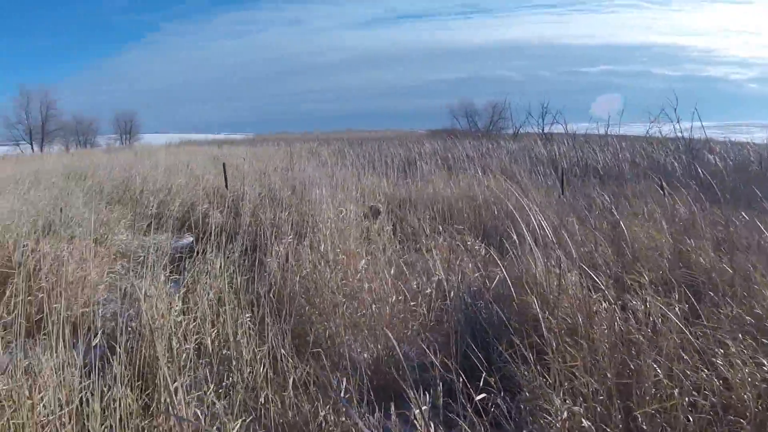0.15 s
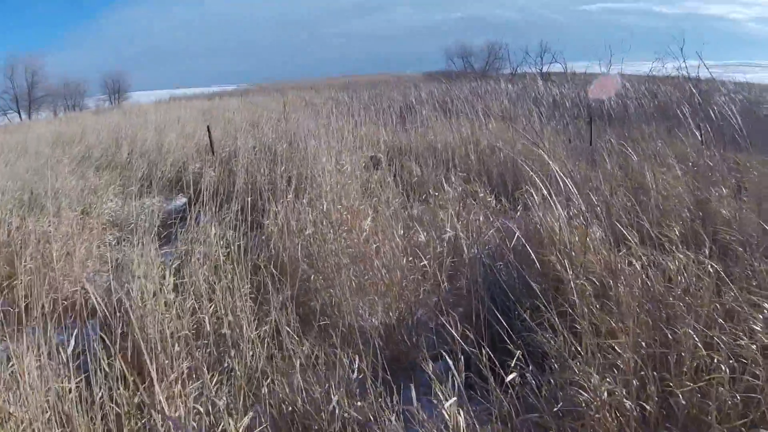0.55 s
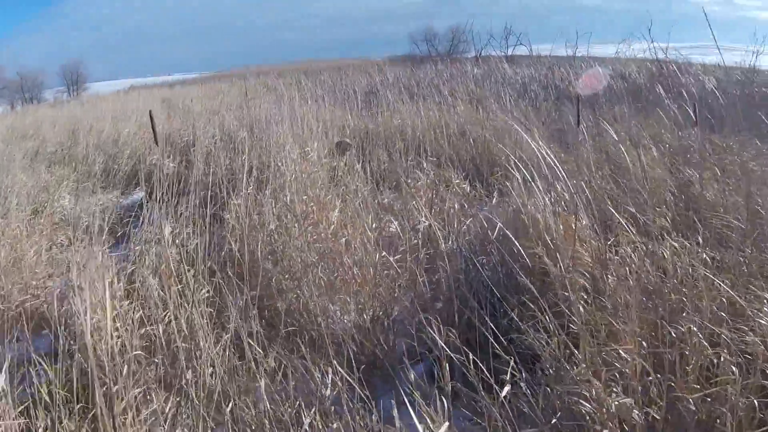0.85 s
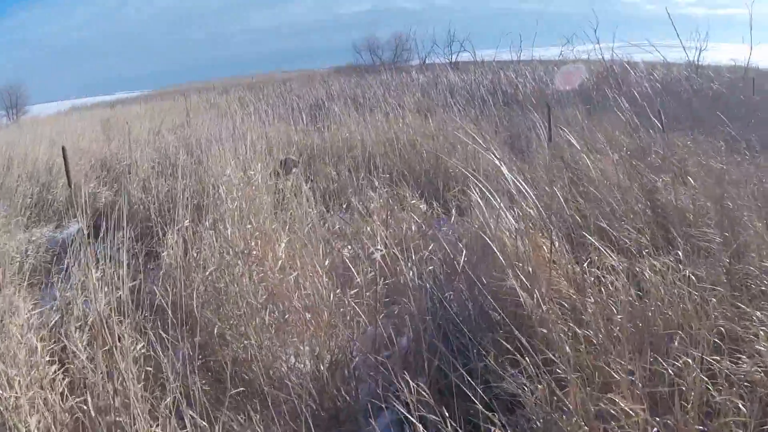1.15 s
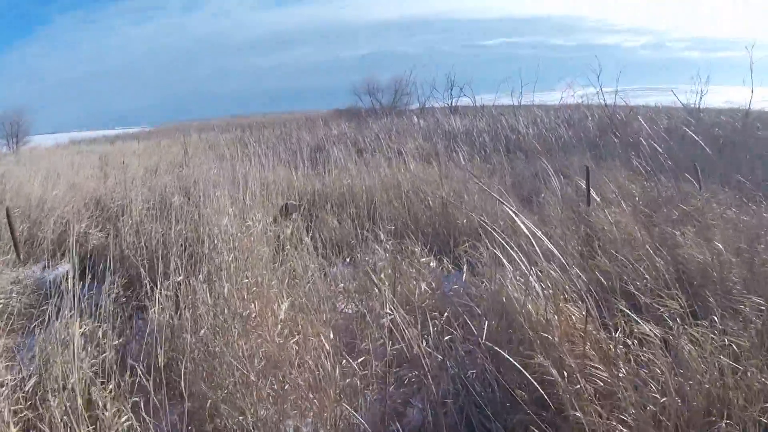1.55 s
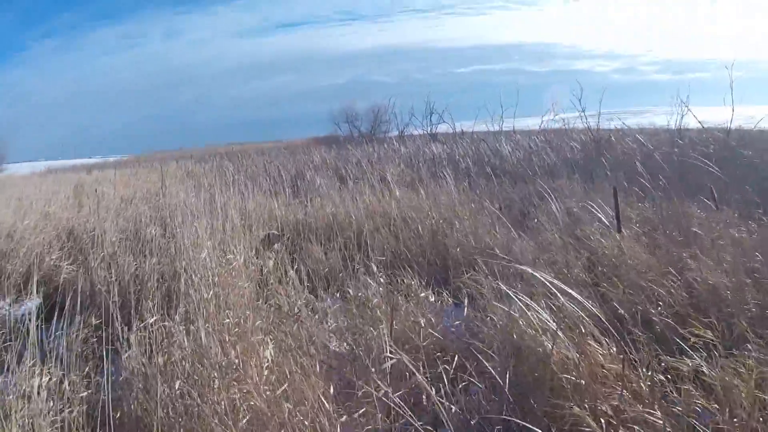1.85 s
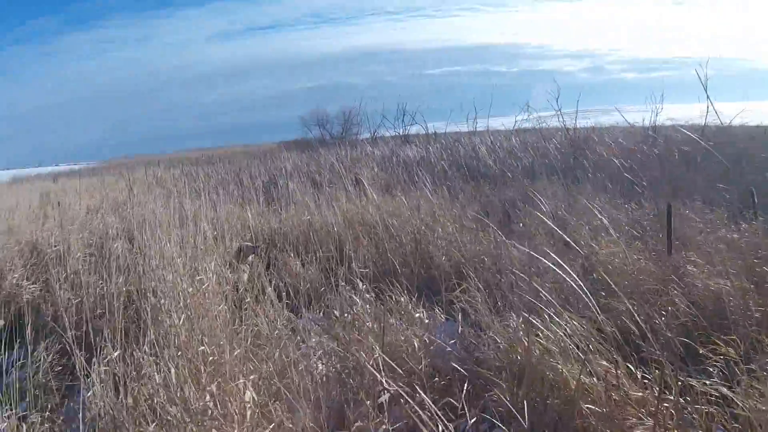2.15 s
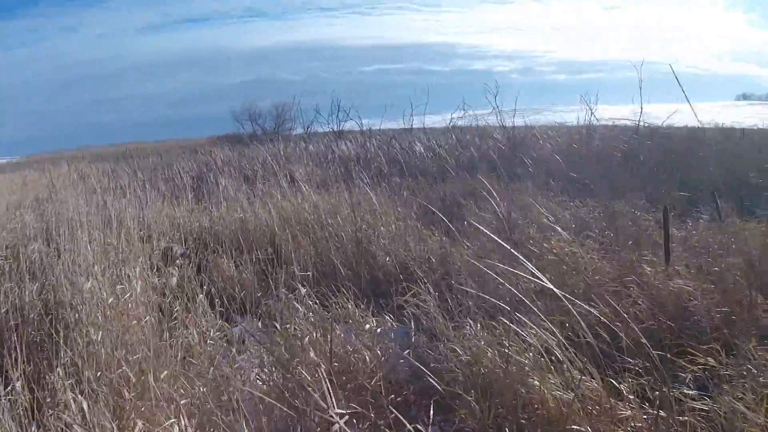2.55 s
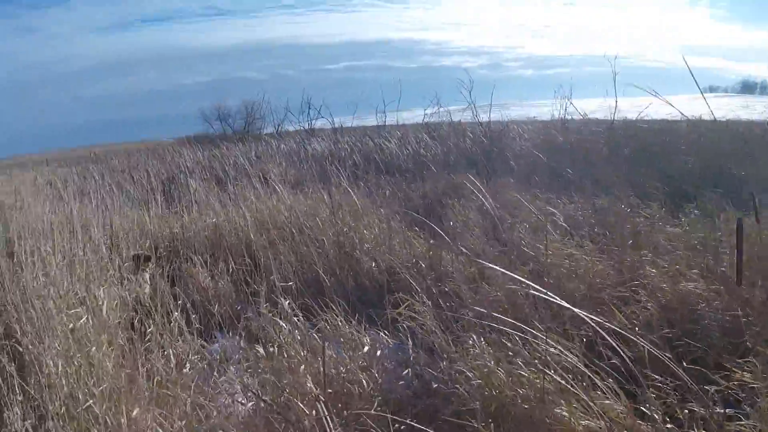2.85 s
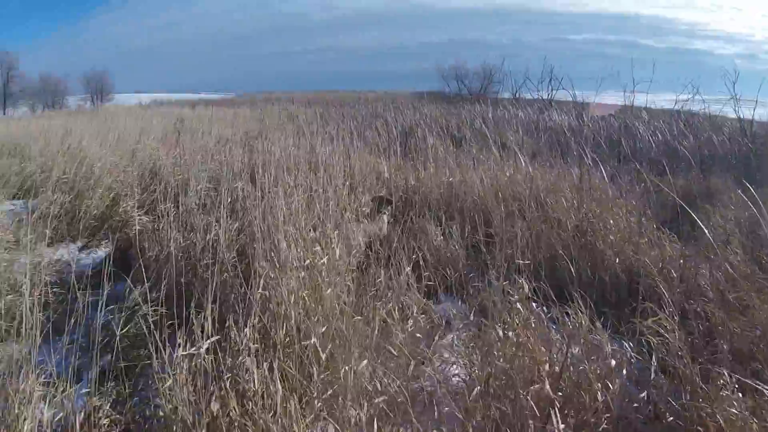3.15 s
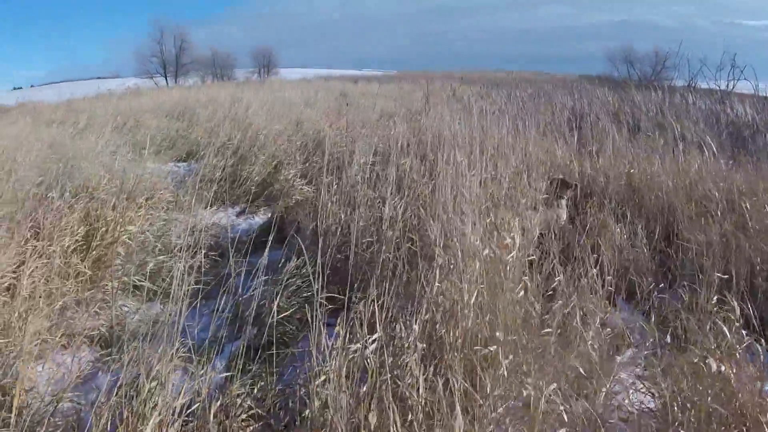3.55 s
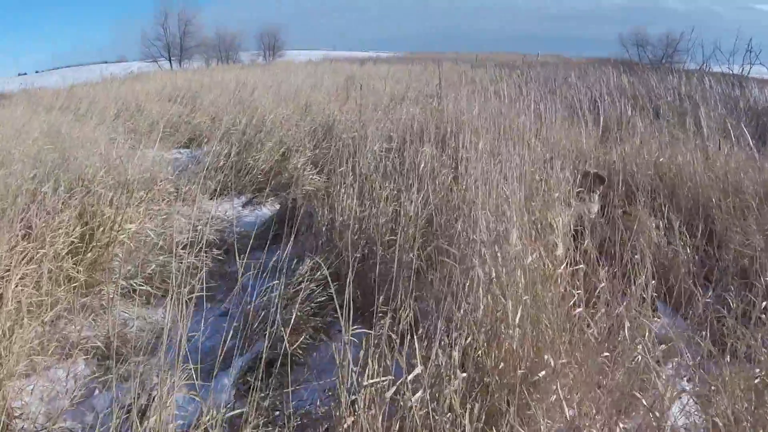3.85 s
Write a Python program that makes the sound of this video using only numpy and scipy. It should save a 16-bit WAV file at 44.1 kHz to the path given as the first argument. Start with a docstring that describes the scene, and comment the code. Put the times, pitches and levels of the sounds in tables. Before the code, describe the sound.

Someone wades through tall dry grass on an open plain, heard through a small housed microphone. Bright, hissy, ticking swishes swell at the start, around 0.8-1.0, 1.7-1.9, 2.4-2.7 and strongest near 3.65 seconds, with stalks snapping between. Deep wind rumble, fluttering buffets, thumps and pops crowd the first three seconds, heaviest around 1.6-2.0, then die away, leaving clear rustling.

```python
"""An open windy plain: someone wades through tall dry grass with a small camera in a closed housing.
Sweeping strides stir a dense rustle of stalk ticks and hiss, which the housing colours with a bright peak.
Stalks snap in cracks of a few milliseconds. Gusts buffet the microphone port: filtered noise makes a deep
rumble, filtered random impulses make sharper eddies, and single pressure bumps make thumps and pops.
"""
import sys
import numpy as np
from scipy import signal
from scipy.fft import rfft, irfft, next_fast_len
from scipy.io import wavfile
from scipy.ndimage import map_coordinates

SR = 44100
rng = np.random.default_rng(int(sys.argv[2]) if len(sys.argv) > 2 else 0)


def attenuation_scalar(level_db):
    """Turn a level in dB into a linear amplitude multiplier (20 dB per decade)."""
    decades = np.asarray(level_db, float) / 20
    return 10 ** decades


def put_to_file(sound):
    """Save the sound as 16-bit audio at rate SR, in the file named by the first command-line argument."""
    columns = np.atleast_2d(sound).T  # one column per channel
    safe = np.clip(columns, -1, 1)
    whole_steps = np.round(safe * 32767)
    wavfile.write(sys.argv[1], SR, whole_steps.astype(np.int16))


N = 176400  # samples: four seconds

# gusts on the microphone port: time_s, eddies_level_db, rumble_level_db
GUSTS = [(0.0, -12, -16), (0.02, -30, -19.5), (0.12, -36.5, -31), (0.14, -29, -17), (0.21, -35.5, -29.5),
         (0.36, -45, -35), (0.4, -42.5, -29), (0.53, -31, -17), (0.63, -31.5, -24), (0.66, -37.5, -32.5),
         (0.71, -25, -12), (0.8, -27.5, -30.5), (0.85, -34, -22.5), (0.92, -38.5, -33),
         (0.99, -27.5, -13.5), (1.07, -26.5, -18), (1.11, -34.5, -49), (1.18, -31.5, -15.5),
         (1.21, -28.5, -27), (1.25, -26, -12.5), (1.29, -23.5, -22), (1.34, -19, -17.5), (1.44, -32.5, -31),
         (1.45, -39, -30), (1.53, -23, -19), (1.55, -29.5, -24.5), (1.63, -18, -11.5), (1.67, -29, -24),
         (1.77, -20.5, -24), (1.83, -29.5, -25), (1.95, -23.5, -31), (1.99, -38, -24.5), (2.03, -27, -18.5),
         (2.15, -29.5, -26), (2.18, -34, -18), (2.26, -26.5, -14.5), (2.32, -35.5, -44),
         (2.34, -36.5, -23.5), (2.47, -26.5, -23.5), (2.48, -24, -18.5), (2.57, -23.5, -25),
         (2.65, -25.5, -14.5), (2.73, -32, -28.5), (2.87, -33.5, -29), (2.88, -38.5, -22.5),
         (3.01, -45.5, -39), (3.07, -44.5, -29.5), (3.19, -56, -41.5), (3.21, -47, -35.5),
         (3.33, -66, -47.5), (3.41, -69, -40), (3.68, -53, -53.5), (3.91, -64, -45.5), (4.0, -59.5, -53)]
# relative spectrum of the deep rumble: pitch_hz, level_db_per_hz
RUMBLE_SPECTRUM = [(12, -17.5), (20, -14.5), (38, 8), (59, 3.5), (102, 3.5), (194, -12), (250, -15),
                   (320, -33.5), (550, -120)]
# relative spectrum of the sharper eddies: pitch_hz, level_db_per_hz
EDDY_SPECTRUM = [(60, -27.5), (130, 6), (200, 1), (400, -9.5), (700, -24.5), (1200, -36), (2500, -61.5),
                 (4000, -128)]
# legs sweeping the grass, before flutter and the dull trim: time_s, bright_level_db, dull_level_db
SWEEPS = [(0, -39.5, -53.5), (.12, -45.5, -59.5), (.2, -51, -64), (.3, -52.5, -63.5), (.44, -55, -64.5),
          (.5, -51.5, -63), (.58, -47, -59.5), (.61, -52, -62), (.69, -49.5, -65), (.73, -43.5, -57.5),
          (.77, -38, -53.5), (.9, -41.5, -56.5), (.98, -40, -55), (1.12, -45.5, -57), (1.16, -50, -62.5),
          (1.25, -54, -65.5), (1.38, -56, -67), (1.42, -50, -62.5), (1.48, -52.5, -62.5),
          (1.505, -42.5, -61), (1.53, -52, -64), (1.67, -51, -65), (1.71, -43, -59.5), (1.8, -40, -56),
          (1.88, -39.5, -54.5), (2.02, -45, -60), (2.08, -52, -66.5), (2.15, -56, -68),
          (2.36, -57.5, -68.5), (2.42, -41, -58), (2.52, -46, -61), (2.6, -47.5, -59), (2.68, -45, -61),
          (2.75, -49.5, -62.5), (2.78, -56, -67), (2.81, -53, -66), (2.9, -59, -68), (3.03, -56, -69),
          (3.08, -50, -66), (3.15, -54, -67.5), (3.29, -53.5, -67), (3.39, -45, -64.5), (3.58, -43.5, -58),
          (3.65, -35.5, -57), (3.72, -41, -55), (3.78, -48, -62), (3.87, -55.5, -64.5), (3.97, -49, -63),
          (4, -49, -67.5)]
# relative spectrum of the bright grass sound through the housing: pitch_hz, level_db_per_hz
HOUSING_SPECTRUM = [(2240, -53.5), (3800, -19), (4260, -20), (4780, -13), (5330, -3.5), (5950, -5),
                    (6250, -4), (6480, 4.5), (6700, -1.5), (7270, -8), (9540, -11.5), (10400, -18.5),
                    (11300, -28.5), (13200, -32), (13900, -41), (14100, -87)]
# relative spectrum of the dull grass sound: pitch_hz, level_db_per_hz
DULL_SPECTRUM = [(150, -12), (500, 8.5), (900, 4.5), (1300, 2), (2700, 2), (4200, -6.5), (5500, -22)]
# broad thumps at the port, before trim and delay: start_s, level_db, half_width_ms (centre to zero crossing)
THUMP_EVENTS = [(0.142, -15.5, 1.25), (0.693, -9.5, 1.43), (0.713, -19, 0.92), (0.975, -23.5, 1.2),
                (0.996, -11, 0.96), (1.013, -9.5, 1.1), (1.358, -7, 1.26), (1.627, -16.5, 0.81),
                (1.75, -8.5, 4.6), (1.78, -9, 2.6), (1.836, -4, 1.66), (1.884, -5, 1.54), (1.935, -2, 2.03),
                (2.22, -16.5, 0.79), (2.473, -6.5, 1.3), (2.642, -6, 2.2), (2.654, -5.5, 1.01),
                (2.88, -14.5, 1.48), (3.07, -14.5, 2.24), (3.129, -23, 3.1), (3.208, -21.5, 2.55),
                (3.251, -26.5, 2.1), (3.42, -29, 4.2)]
# stalks snapping, before trims and filters: start_s, bright_level_db, dull_level_db
SNAP_EVENTS = [(0.2434, -40, -36), (0.2473, -34, -47), (0.2775, -25, -67.5), (0.545, -28, -52),
               (0.577, -25, -44), (0.6753, -44, -54), (0.762, -45, -42), (0.7726, -24, -45),
               (0.8721, -35, -44), (1.0424, -37.5, -40), (1.1013, -21, -47), (1.1304, -17, -39),
               (1.219, -31, -44), (1.32, -47, -44), (1.374, -39, -48), (1.4181, -37, -66),
               (1.432, -32, -51.5), (1.455, -25, -63), (1.4971, -25, -46), (1.6426, -34, -67),
               (1.6785, -31, -55), (1.9924, -34, -44), (2.009, -30, -49), (2.326, -35, -58),
               (3.3161, -33, -60), (3.3617, -34, -51), (3.8959, -31, -64), (3.9588, -40, -67)]
# sharp pops at the port, before trims and delay:
# start_s, level_db, half_width_ms (centre to zero crossing), flutter_level_db, flutter_length_ms
POP_EVENTS = [(0.515, -44, 0.19, -41, 2.9), (0.71, -8.5, 0.45, -21.5, 3.7), (1.012, -16.5, 0.42, -35, 3.7),
              (1.254, -42, 0.53, -45, 4), (1.273, -35, 0.45, -38, 4.4), (1.34, -17, 0.63, -42, 3.2),
              (1.52, -26, 0.55, -42, 4.7), (1.621, -19.5, 0.45, -37, 4), (1.7, -40, 0.45, -43, 2.8),
              (1.759, -20.5, 0.4, -34, 4.7), (1.782, -19, 0.45, -36, 2.8), (1.836, -21.5, 0.33, -36, 2.8),
              (1.843, -4.5, 0.49, -25, 3.5), (1.891, -21.5, 0.3, -34, 4), (1.935, -29, 0.41, -35.5, 3),
              (2.188, -20.5, 0.61, -40, 3.5), (2.264, -21, 0.41, -32.5, 4.7),
              (2.478, -29.5, 0.39, -41, 3.5), (2.513, -28, 0.38, -29, 4), (2.529, -37, 0.35, -29.5, 3.6),
              (2.546, -25, 0.32, -28, 4.7), (2.566, -19, 0.42, -45, 3.4), (2.593, -23, 0.45, -38, 4.7),
              (2.608, -23, 0.43, -33, 4), (2.643, -36, 0.64, -25.5, 4), (2.659, -15.5, 0.35, -26.5, 4.7),
              (2.724, -28, 0.27, -37, 2.6), (2.859, -39, 0.38, -44, 3.4), (3.442, -37, 0.39, -45, 2.5),
              (3.471, -35, 0.45, -57, 4), (3.51, -31.5, 0.57, -47, 3.4), (3.702, -35, 0.42, -54, 4.7),
              (3.719, -40, 0.29, -49, 4.7), (3.772, -37, 0.57, -52, 4)]
# relative spectrum of the rough flutter around a pop: pitch_hz, level_db_per_hz
FLUTTER_SPECTRUM = [(200, -35.5), (450, 9), (900, -7), (1600, -14), (2600, -26), (4000, -55)]


def unit(x):
    """Scale to rms 1."""
    return x / np.sqrt(np.mean(x ** 2) + 1e-20)


def curves(rows):
    """One value per sample for each column after the time."""
    time_s, *columns = np.transpose(rows)
    clock_s = np.arange(N) / SR
    return [np.interp(clock_s, time_s, column) for column in columns]


def wobble(rate):
    """A smooth random curve, rate knots a second."""
    knots = rng.standard_normal(int(N * rate / SR) + 4)
    return map_coordinates(knots, [np.arange(N) * rate / SR])


def coloured(x, spectrum):
    """Filter x causally, with minimum phase, to a spectrum scaled so that white noise keeps its rms."""
    size = 2 * next_fast_len(N // 2 + 4096)
    pitch_hz, level_db = np.transpose(spectrum)
    hz = np.fft.rfftfreq(size, 1 / SR)
    gain = unit(attenuation_scalar(np.interp(np.log(hz + 1), np.log(pitch_hz + 1), level_db)))
    # folding the cepstrum onto positive times gives the minimum phase
    cepstrum = irfft(np.log(gain + 1e-5), size)
    cepstrum[1:size // 2] *= 2
    cepstrum[size // 2 + 1:] = 0
    response = np.exp(rfft(cepstrum))
    return irfft(rfft(x, size) * response, size)[:N]


def impulses(per_s, spread_db):
    """Random impulses of either sign, a few larger than the rest; rms 1."""
    when, size, sign = rng.random((3, N))
    present = when < per_s / SR
    height = attenuation_scalar(-spread_db * np.log(size + 0.005))
    return unit(present * height * np.sign(sign - 0.5))


def wind():
    """A lumpy rumble and a stream of passing eddies, both riding the gusts at the port."""
    eddy_db, rumble_db = curves(GUSTS)
    rumble_lumps = attenuation_scalar(0.5 * wobble(12))
    rumble = unit(rumble_lumps * coloured(rng.standard_normal(N), RUMBLE_SPECTRUM))
    eddy_lumps = attenuation_scalar(2.5 * (wobble(25.515) + 0.55 * wobble(90)))
    eddies = unit(eddy_lumps * coloured(impulses(per_s=450, spread_db=2), EDDY_SPECTRUM))
    return attenuation_scalar(rumble_db) * rumble + attenuation_scalar(eddy_db) * eddies


def rustle():
    """Dense tiny stalk ticks over a hiss of far blades, heard in a bright and a dull band."""
    bright_db, dull_db = curves(SWEEPS)
    tick_share, dull_trim_db = 0.31, 4  # share of the power, the rest is hiss
    ticks = tick_share ** 0.5 * impulses(per_s=2500, spread_db=3.5)
    hiss = (1 - tick_share) ** 0.5 * rng.standard_normal(N)
    stalks = (ticks + hiss) * attenuation_scalar(wobble(14) + 0.73 * wobble(50))
    bright = coloured(stalks * attenuation_scalar(bright_db), HOUSING_SPECTRUM)
    dull = coloured(stalks * attenuation_scalar(dull_db + dull_trim_db), DULL_SPECTRUM)
    return bright + dull


def bumps(rows, trim_db, delay_s):
    """Smooth pressure bumps with a small swing back on both sides."""
    out, t = np.zeros(N), np.arange(-600, 600) / SR
    for start_s, level_db, half_width_ms, *_ in rows:
        u = t / (half_width_ms / 1000)
        at = round((start_s + delay_s) * SR) - len(t) // 2
        out[at:at + len(t)] += attenuation_scalar(level_db + trim_db) * (1 - u ** 2) * np.exp(-u ** 2 / 2)
    return out


def thumps():
    """Broad pushes of air raise the pressure at the port."""
    return bumps(THUMP_EVENTS, trim_db=-4, delay_s=0.0031)


def snaps():
    """Each breaking stalk is a crack of a few milliseconds through the bright and the dull band."""
    t60_s, tail_db = 0.009, -5  # splinters after the first break
    bright_trim_db, dull_trim_db = -3, 8.5
    bright, dull, t = np.zeros(N), np.zeros(N), np.arange(400) / SR
    decay = attenuation_scalar(tail_db - 60 * t / t60_s)
    for start_s, bright_db, dull_db in SNAP_EVENTS:
        crack = rng.standard_normal(len(t)) * decay
        crack[0] = 1  # the first break
        crack = 3 * crack / np.linalg.norm(crack)  # equal energy for every crack
        at = round(start_s * SR)
        bright[at:at + len(t)] += attenuation_scalar(bright_db + bright_trim_db) * crack
        dull[at:at + len(t)] += attenuation_scalar(dull_db + dull_trim_db) * crack
    # the dull band of a snap stays level below the third point
    return coloured(bright, HOUSING_SPECTRUM) + coloured(dull, DULL_SPECTRUM[2:])


def pops():
    """Sharp suction pops lower the pressure at the port, each in a short rough flutter."""
    clock_ms, flutter_trim_db = np.arange(N) / SR * 1000, -2.5
    burst = np.zeros(N)
    for start_s, _, _, flutter_db, length_ms in POP_EVENTS:
        # a bell-shaped swell, centred one length after the start
        u = (clock_ms - start_s * 1000) / length_ms - 1
        burst += attenuation_scalar(flutter_db + flutter_trim_db) * np.exp(-u ** 2 / 2)
    flutter = burst * unit(coloured(rng.standard_normal(N), FLUTTER_SPECTRUM))
    return flutter - bumps(POP_EVENTS, trim_db=-4.5, delay_s=0.0021)


def scene():
    """Wind and grass at one microphone."""
    return (wind() + rustle() + thumps() + snaps() + pops())[None]


def roll_off(x):
    """The treble ends steeply here."""
    return signal.sosfilt(signal.butter(12, 14120, fs=SR, output="sos"), x)


def record(dry):
    """The preamplifier bends smoothly towards a ceiling and rounds off the biggest gusts."""
    ceiling = 0.6  # of full scale
    rounded = dry / (1 + np.abs(dry / ceiling) ** 4) ** (1 / 4)
    return roll_off(rounded)


dry = scene()
out = record(dry)
put_to_file(out)
```